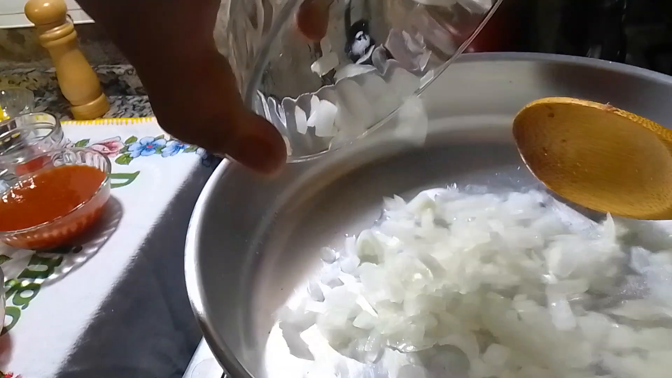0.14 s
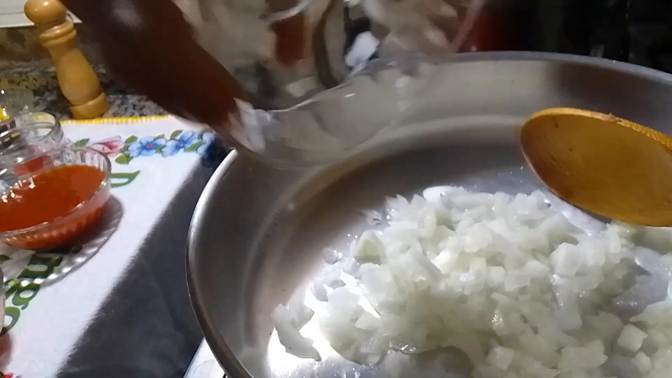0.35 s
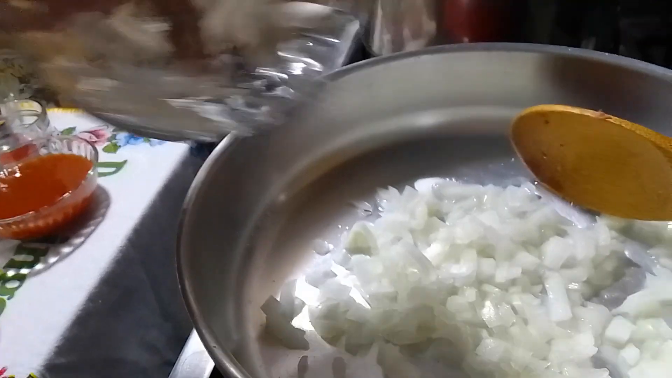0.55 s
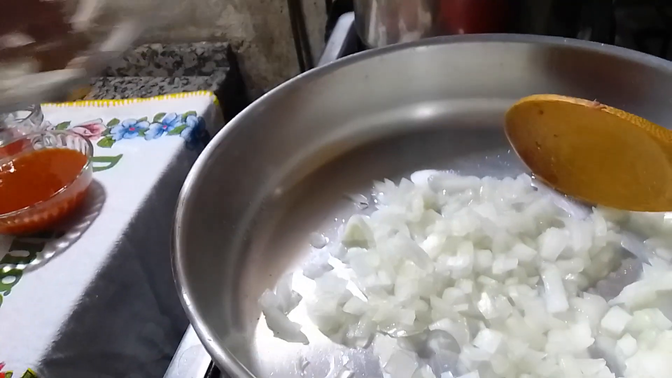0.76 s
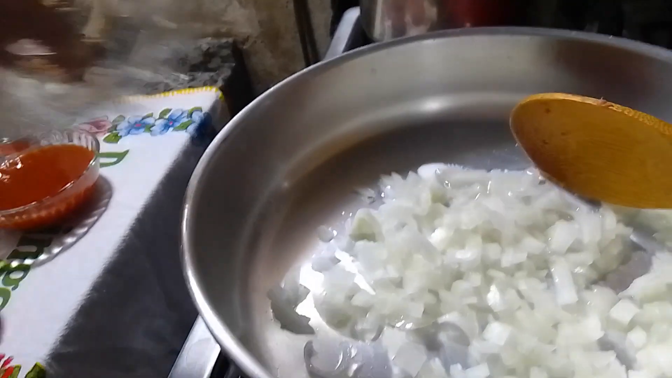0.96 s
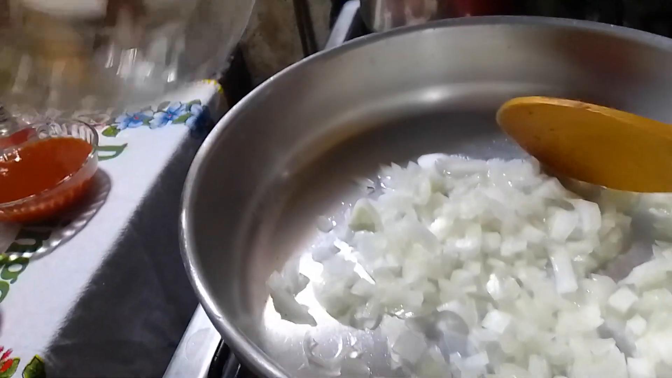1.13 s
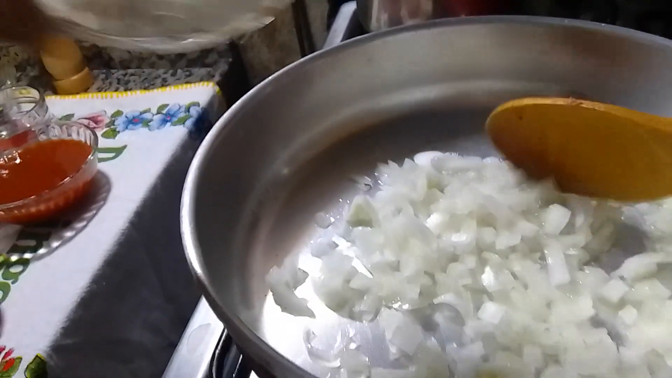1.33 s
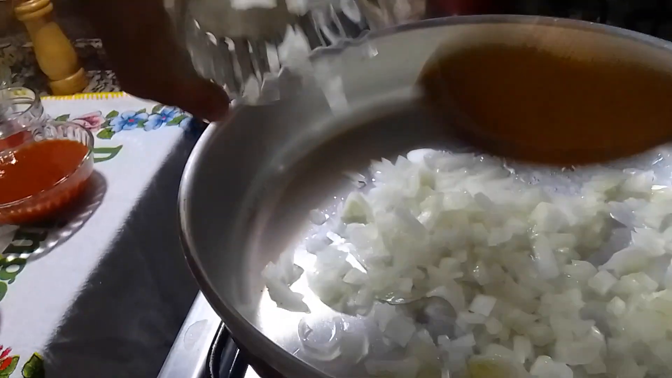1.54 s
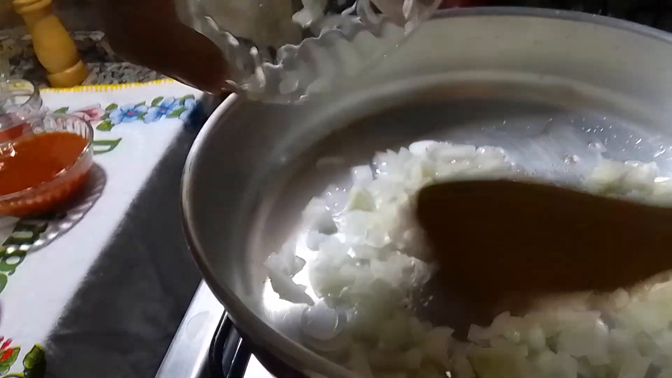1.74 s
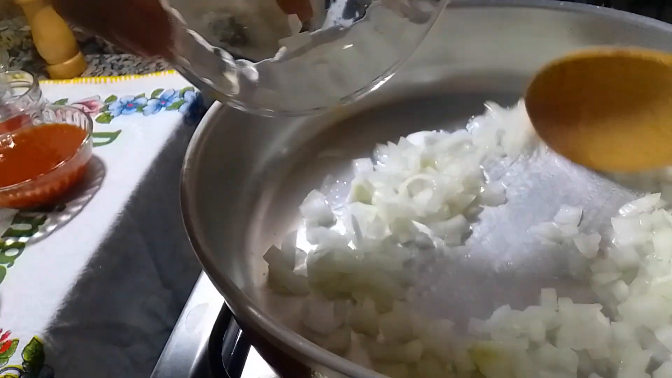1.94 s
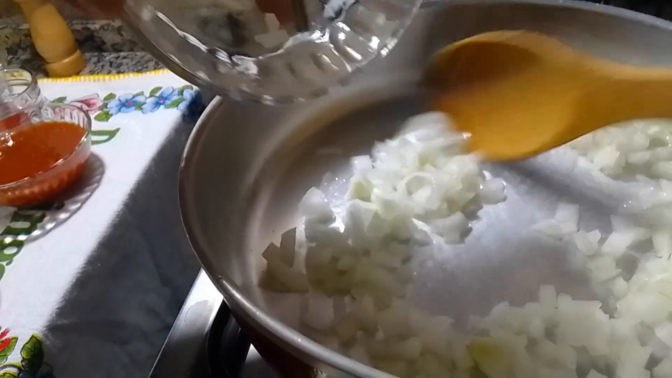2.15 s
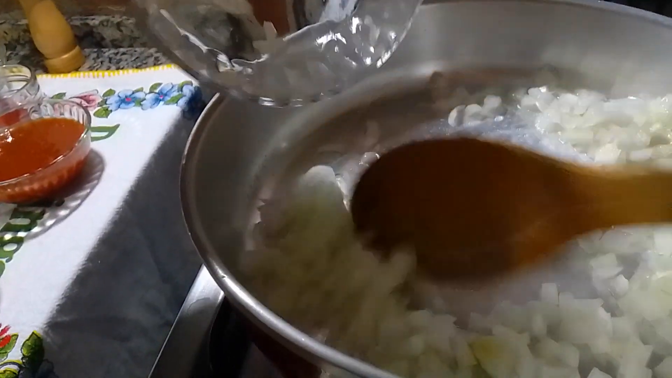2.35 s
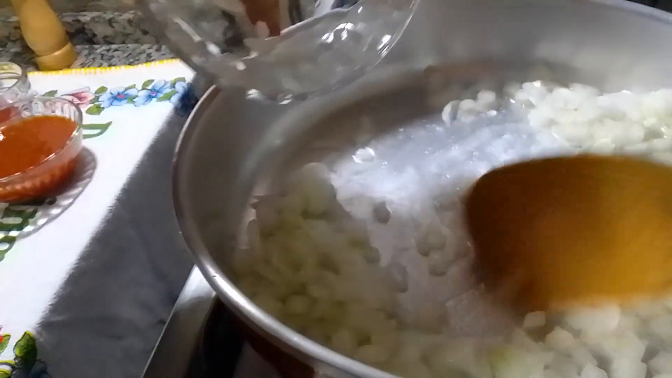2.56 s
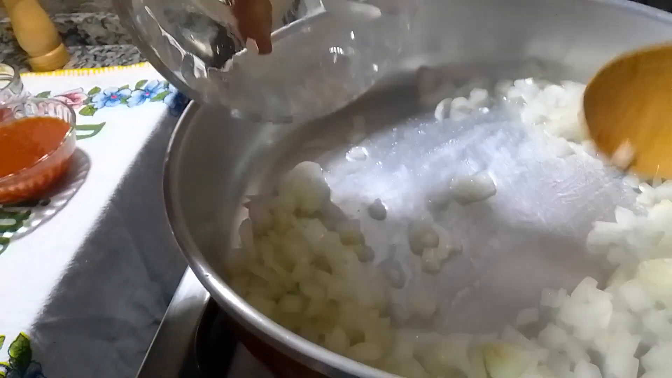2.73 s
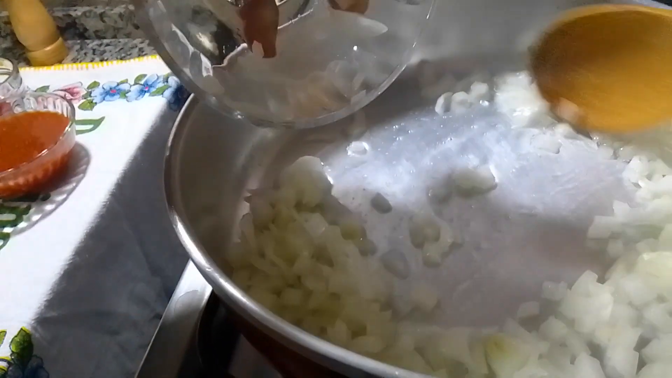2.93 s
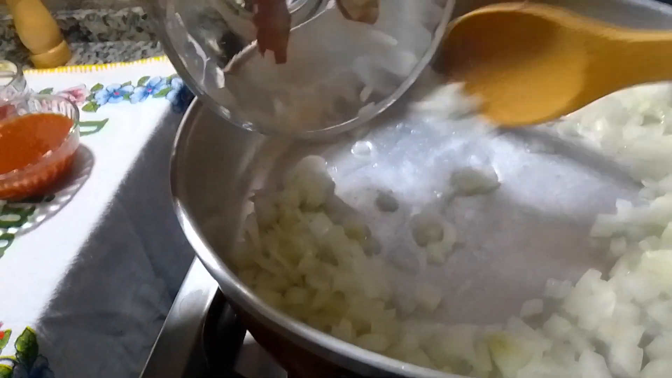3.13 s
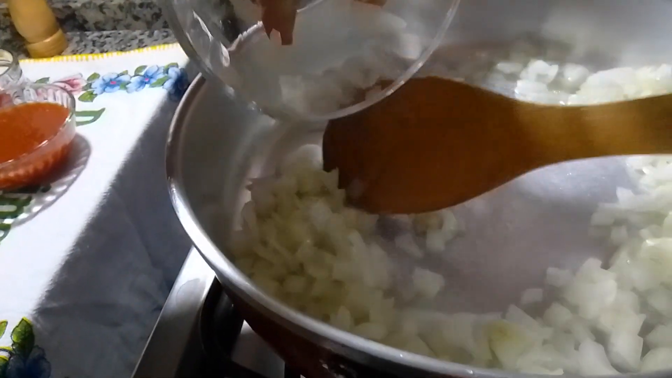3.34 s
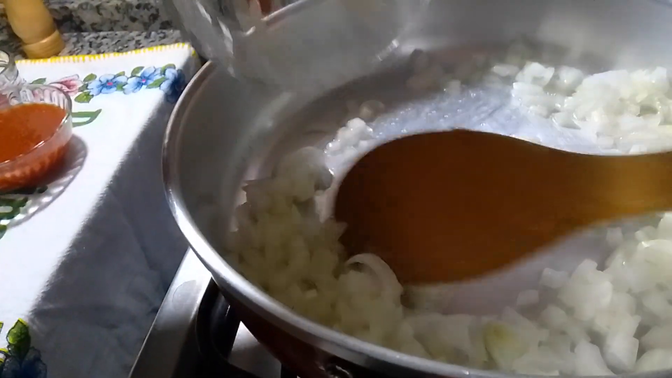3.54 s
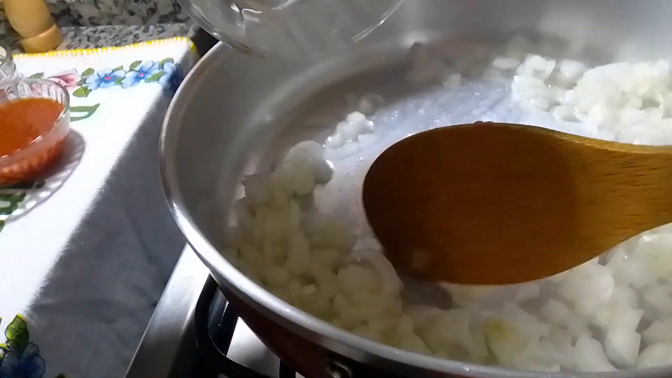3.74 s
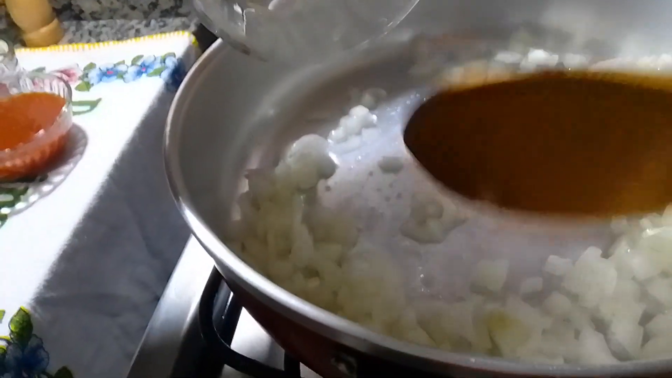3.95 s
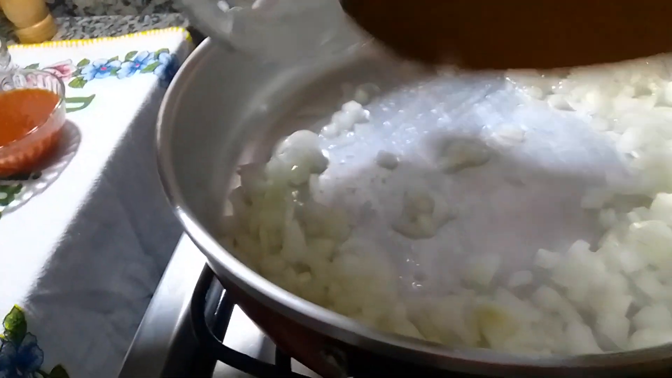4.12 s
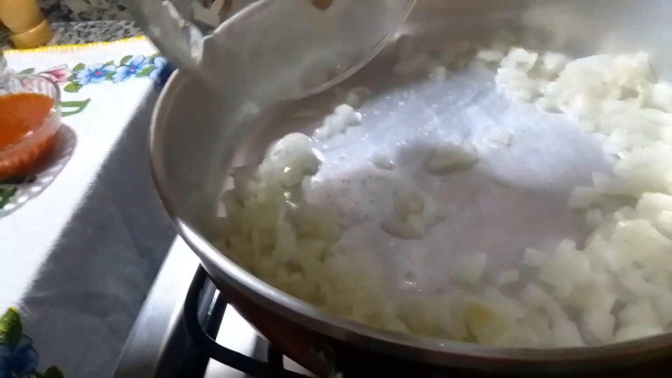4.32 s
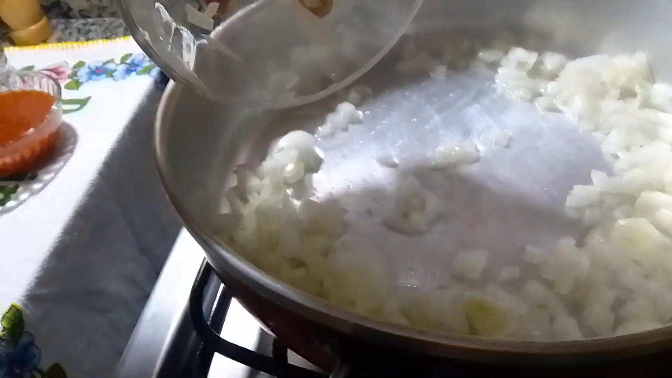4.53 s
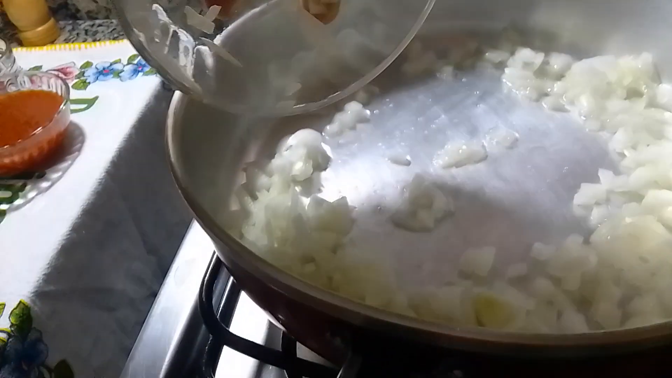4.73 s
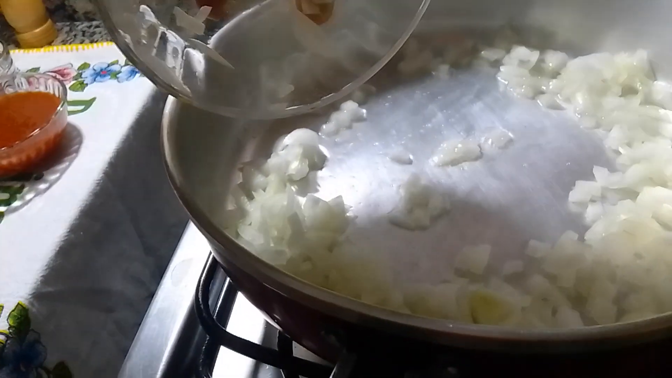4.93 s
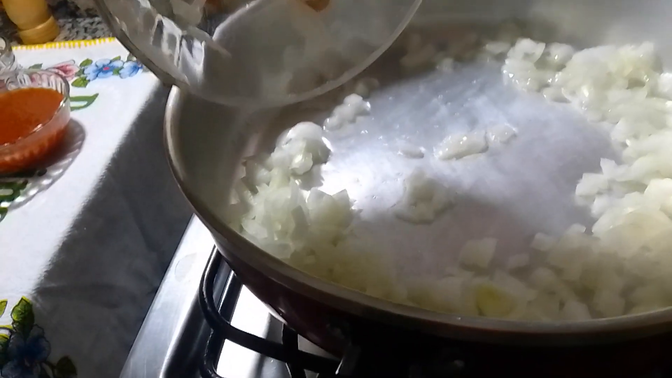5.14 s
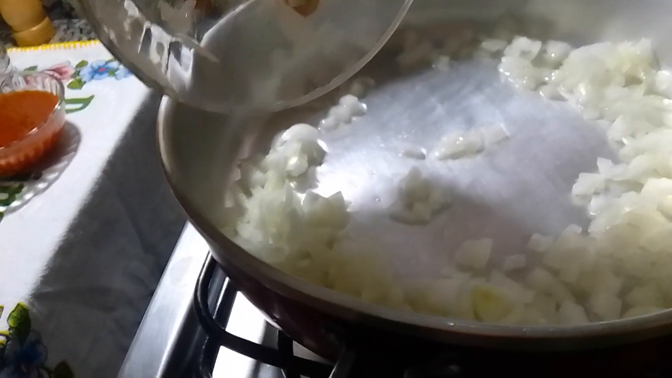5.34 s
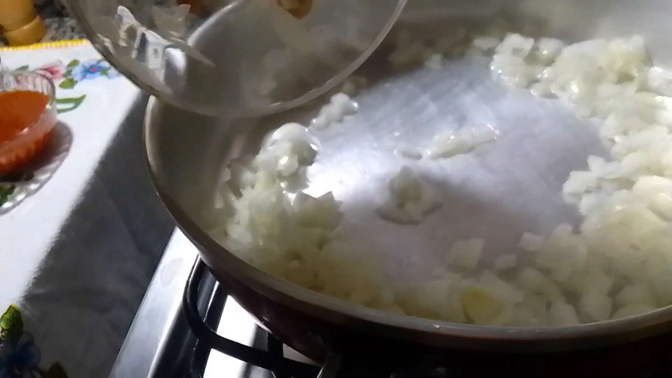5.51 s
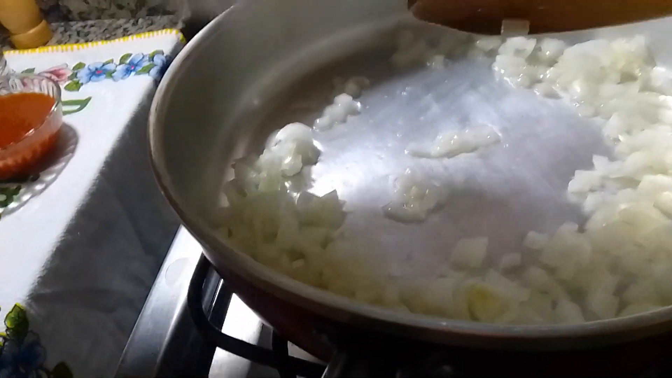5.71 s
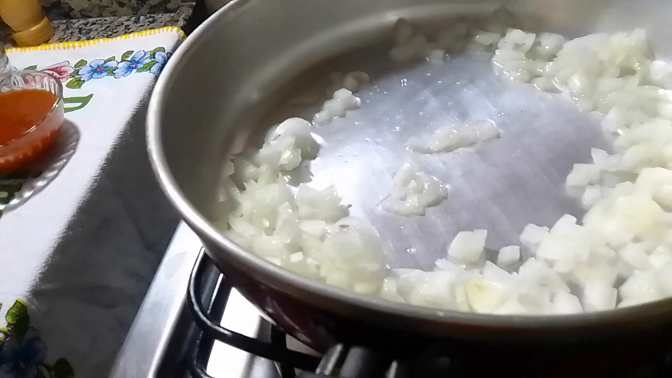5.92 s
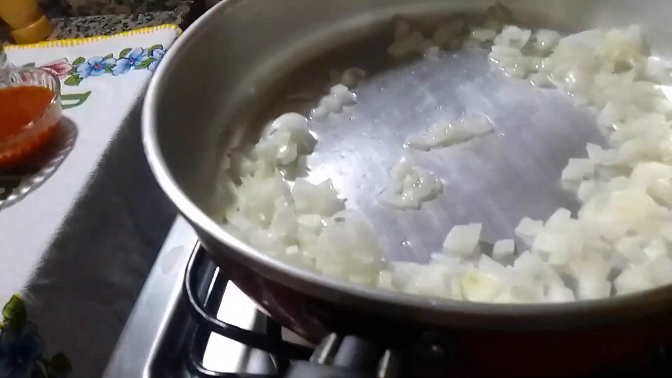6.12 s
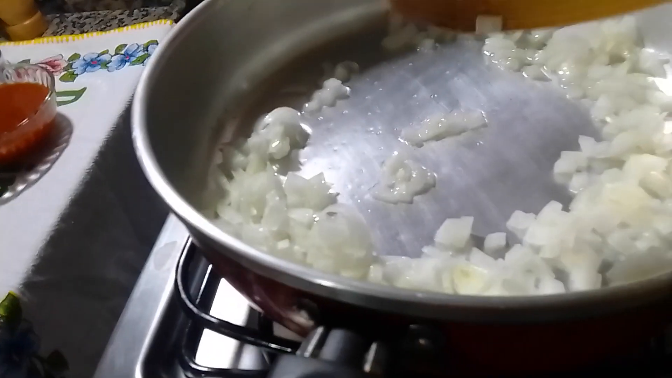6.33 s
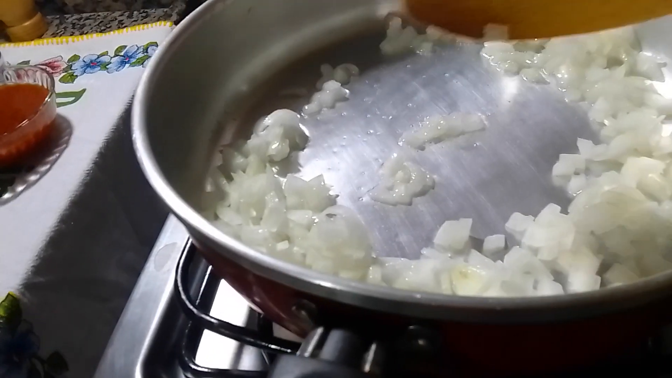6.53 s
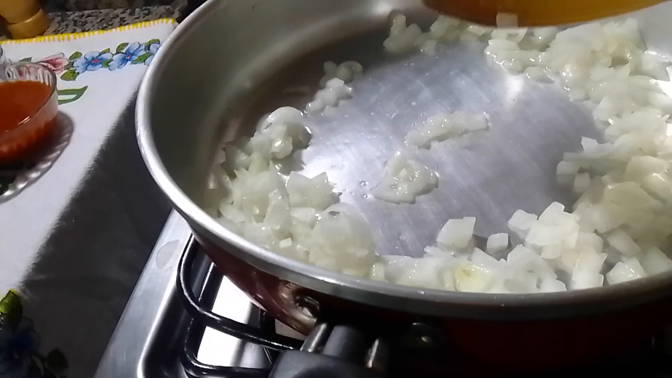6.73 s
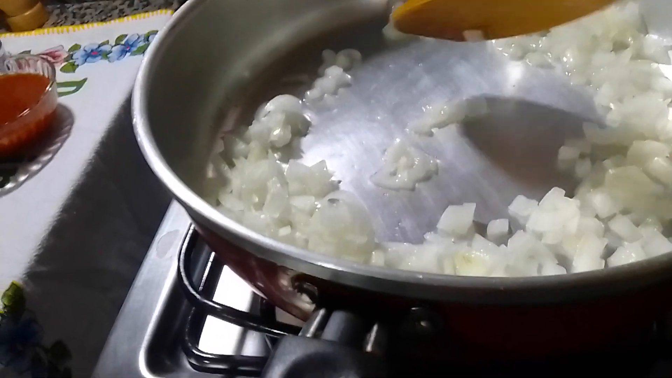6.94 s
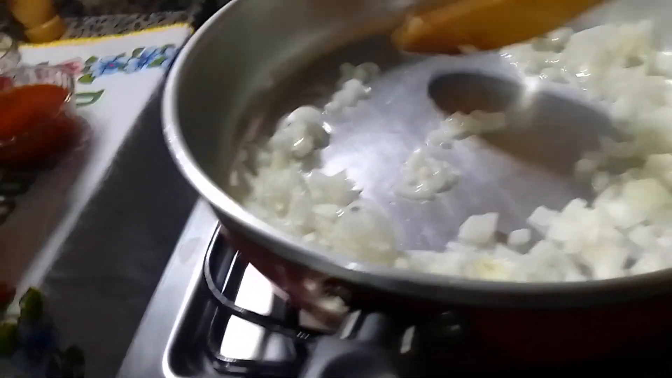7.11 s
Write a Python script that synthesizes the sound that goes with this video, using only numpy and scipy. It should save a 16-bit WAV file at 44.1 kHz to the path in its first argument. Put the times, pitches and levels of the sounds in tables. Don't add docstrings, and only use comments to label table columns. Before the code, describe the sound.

At 0 s a light frying hiss is already present, with small knocks of bowl and onion on a steel pan. Around 0.1 s the wet onion lands in a cluster of short, damped metallic thuds and the frying leaps into a dense, bright, steamy roar, loudest near 0.2-0.3 s, with a brief low splutter underneath. It eases quickly through the first second, with wet pops and sharp spits. At about 1.7-1.85 s a wooden spoon knocks the pan and drags onion over its floor, and the sizzle swells slightly near 2.1 s. Softer knocks and a scrape come at 3.2-3.4 s, a very faint tap near 4.5 s, and a light clink at 5.2 s. The sizzle keeps thinning to a fine crackle until 7 s. Close, dry kitchen sound, centred, weak in bass, with a ringing high edge near 9 kHz.

```python
import sys
import numpy as np
from scipy import signal
from scipy.fft import rfft, irfft, next_fast_len
from scipy.io import wavfile
from scipy.ndimage import uniform_filter1d, map_coordinates

SR = 44100
rng = np.random.default_rng(int(sys.argv[2]) if len(sys.argv) > 2 else 0)


def voltage_ratio(decibels):
    exponent = np.asarray(decibels, float) / 20
    return 10 ** exponent


def unload_wav(signal):
    wavfile.write(
        sys.argv[1],
        SR,
        np.round(np.clip(np.atleast_2d(signal).T, -1, 1) * 32767).astype(np.int16),
    )


N = 316195

# pitch_hz, level_db (per Hz)
FIZZ = [(2710, -37), (4600, -20), (5790, -17), (8940, 0), (12100, -11), (15600, -15)]
# pitch_hz, level_db, fade_s (time to fall 60 dB)
PAN = [(175, -1.5, .12), (230, 9.5, 0.17), (349, -1, 0.22), (472, 4.5, 0.13), (612, -6, 0.29),
       (751, 0, 0.1), (850, 4, 0.058), (950, 3.5, 0.067), (1075, -2.5, 0.026), (1268, 9, 0.035),
       (1620, 3, 0.049), (1970, 5.5, 0.043), (2280, 1, 0.066), (2710, 5, 0.059)]


def frying():
    # pitch_hz, level_db (per Hz)
    drone_colour = [(300, -23.5), (450, -11), (800, 1.5), (1200, -2), (1700, -31)]
    # pitch_hz, level_db (per Hz)
    splutter_colour = [(24, -54), (40, -26), (81, -25), (145, -2.5), (197, -4), (295, 0), (500, 3),
                       (650, -24.5)]
    fizz_gain, hiss_gain, drone_gain, low_gain = layer_levels()
    surge_db = 0.16 * wobble(9) + 0.35 * wobble(21.9) + 0.43 * wobble(60)
    crowd = bursts(share=0.012, spread_db=2.5, life_s=0.0027, cap_db=12)
    lumps = bursts(share=0.003, spread_db=4.0, life_s=0.0042, cap_db=-1)

    fizz = coloured(patchy(crowd + blur(6.1), depth_db=0.69, drift_db=0.4), FIZZ)
    hiss = pan_air(patchy(crowd + blur(6.0), depth_db=0.8, drift_db=1.3))
    rings = [(hz, 0.87 / fade_s, -1.5 + db) for hz, db, fade_s in PAN]
    rumble = 0.67 * crowd + 0.75 * lumps + blur(2.5)
    drone = coloured(patchy(rumble, depth_db=1.5, drift_db=0.0), drone_colour, rings)
    low = coloured(0.5 * crowd + lumps + blur(7.5), splutter_colour, rings)

    fizz = voltage_ratio(0.5) * fizz_gain * unit(voltage_ratio(surge_db) * fizz)
    hiss = hiss_gain * unit(voltage_ratio(1.9 * surge_db) * hiss)
    drone = drone_gain * unit(voltage_ratio(1.6 * surge_db + 0.52 * wobble(5.5)) * drone)
    low = low_gain * unit(voltage_ratio(0.44 * surge_db + 1.3 * wobble(14)) * low)
    return fizz + hiss + drone + low


def bursts(share, spread_db, life_s, cap_db):
    draw = rng.random((N, 2))
    size_db = np.minimum(-spread_db * np.log(draw[:, 1] + 1e-9), cap_db)
    starts = (draw[:, 0] < share) * voltage_ratio(size_db)
    puff = voltage_ratio(-60 * np.arange(600) / SR / life_s)
    return unit(signal.fftconvolve(starts, puff)[:N] * rng.standard_normal(N))


def blur(level_db):
    return voltage_ratio(level_db) * rng.standard_normal(N)


def layer_levels():
    # start_s, length_s, strength_db
    drags = [
        (0.0, 0.1, -49),
        (0.066, 0.089, -38),
        (1.706, 0.24, -45.5),
        (1.95, 0.13, -46),
        (2.547, .35, -55),
        (3.213, 0.224, -46.5),
        (3.55, .3, -63),
    ]
    t = np.arange(N) / SR
    fizz_db = strength_db(t)
    swing_db = fizz_db - fizz_db.mean()
    hiss_db = fizz_db.mean() - 17 + 1.025 * swing_db

    lands_s, spreads_s, settles_s = 0.11, 0.084, 0.25
    since = np.maximum(t - lands_s, 0)
    wet = (1 - np.exp(-since / spreads_s)) * np.exp(-since / settles_s)

    drag, ramp_s = 0, 0.014
    for start, length, db in drags:
        to_nearest_end = np.minimum(t - start, start + length - t)
        drag = drag + voltage_ratio(db) * np.clip(to_nearest_end / ramp_s, 0, 1)
    drone = np.hypot(voltage_ratio(-53.5 + 0.54 * swing_db + 26 * wet), drag)
    low = np.hypot(voltage_ratio(-57 + 0.32 * swing_db + 29 * wet), voltage_ratio(-4) * drag)
    return voltage_ratio(fizz_db), voltage_ratio(hiss_db), drone, low


def strength_db(s):
    # time_s, level_db
    strength = [(0, -25.5), (.05, -31), (.059, -20.5), (.085, -19.5), (.1, -13.5), (.19, -8), (.33, -9.5),
                (.7, -13.5), (1.12, -16.5), (1.65, -17), (2.08, -14.5), (2.33, -17.5), (2.6, -15.5),
                (3.2, -18), (3.95, -20.5), (4.6, -22), (5.75, -23.5), (7.17, -25.5)]
    return np.interp(s, *np.transpose(strength))


def spits():
    # start_s, push_peak_db, middle_db
    pops = [(0.428, -27, -15), (0.613, -35, -20), (0.639, -31, -34), (0.675, -26, -34), (0.705, -34, -15.5),
            (0.799, -30, -34), (0.875, -31, -20), (0.892, -37, -20), (1.071, -28.5, -30), (1.129, -48, -24),
            (1.199, -54, -37), (1.303, -32, -17), (1.356, -45, -23), (1.459, -42, -22), (1.592, -51, -34),
            (2.053, -28.5, -22), (2.163, -30, -17.5), (2.226, -32.5, -30), (2.257, -35, -37),
            (2.548, -36, -24), (2.802, -31, -29), (3.632, -38, -22.5), (4.594, -45, -23)]
    # pitch_hz, width_hz, level_db
    song = [(8700, 4500, 5)]
    rows = bubbles()
    crack = puffs(rows, column=1, life_s=0.0047, crack=2.3, late_s=0.0011)
    bright = voltage_ratio(5) * coloured(crack, FIZZ, song)
    middle = voltage_ratio(12) * pan_air(puffs(rows, column=2, life_s=0.01, crack=3.2, late_s=0.00095))
    thump = puffs(pops, column=1, life_s=0.013, crack=45, late_s=0.00342)
    push = voltage_ratio(18) * coloured(thump, [(60, -44), (200, 7.5), (600, 7.5), (1300, 5), (4000, -40)])
    slap = voltage_ratio(17) * pan_air(puffs(pops, column=2, life_s=0.04, crack=2.8, late_s=0.00205))
    return bright + middle + push + slap


def bubbles():
    # start_s, peak_db, middle_db
    large = [(0.0323, -4, -34), (0.0578, -8, -35), (0.0932, 9, -22), (0.1236, 8, -29), (0.6205, 7, -24),
             (0.6744, 19, -33), (0.7632, 6, -36), (0.8709, 3, -12), (2.7225, 0, -19), (1.843, -2, -17),
             (2.2124, 8, -33), (2.4718, 4.5, -15), (2.7965, 9, -33), (2.8429, 3, -16), (2.9552, 2, -16),
             (3.5039, 7, -23), (3.6321, 4, -29), (3.8307, 3.5, -29), (3.8531, -3, -26), (4.2961, 4, -20),
             (4.5955, 4, -28), (4.8184, -12, -24), (5.3009, -5, -32), (6.2477, -9, -35), (6.2801, 4.5, -25),
             (6.4273, 0, -50), (6.562, -2.5, -38), (6.7077, -6, -40), (6.8154, -6, -36), (6.9471, 0.5, -43)]
    count, scatter_db = 40, 3
    s = rng.uniform(0.15, 7.1, count)
    luck_db = scatter_db * rng.standard_normal((2, count))
    peak_db = strength_db(s) + 15 + luck_db[0]
    middle_db = strength_db(s) - 15 + luck_db[1]
    return np.vstack([large, np.transpose([s, peak_db, middle_db])])


def puffs(rows, column, life_s, crack, late_s):
    out, t = np.zeros(N + 2000), np.arange(1500) / SR
    for row, noise in zip(rows, rng.standard_normal((len(rows), 1500))):
        puff = np.where(t > 0, noise, -crack) * voltage_ratio(-60 * t / life_s)
        start = round((row[0] + late_s) * SR)
        out[start:][:len(t)] += voltage_ratio(row[column]) * puff / np.linalg.norm(puff)
    echo = np.roll(out, round(0.0017 * SR))
    return out[:N] + voltage_ratio(-11.5) * echo[:N]


def knocks():
    # start_s, peak_db, centre_hz, spread_octaves, ring_share (of fade_s)
    tipping = [(.012, -25, 774, 0.1, 3.2), (0.011, -32, 1620, .1, 2.8), (.063, -17.5, 623, 0.22, 1.06),
               (.066, -10, 1100, 0.44, 0.66), (0.066, -22, 2300, .35, 2.7), (.088, -15, 1300, 0.17, 1.7),
               (.104, -12.5, 870, .2, 0.65), (.121, -17, 735, 0.098, 0.7), (5.162, -22.5, 1620, 0.2, 0.5),
               (5.164, -24, 1075, 0.082, 2.4), (5.162, -28, 2200, .3, .2)]
    # start_s, peak_db, centre_hz, spread_octaves
    spoon = [(1.71, -30, 170, 0.22), (1.753, -24, 186, 0.17), (1.709, -26, 850, 0.34),
             (1.75, -8.5, 1190, 0.52), (1.754, -16.5, 425, 0.28), (1.759, -15, 900, .8),
             (1.769, -25, 650, 0.25), (1.843, -15, 754, 0.64), (3.215, -20.5, 643, 0.22),
             (3.224, -18, 750, 0.27), (3.215, -16.5, 1800, 0.39), (3.222, -26, 253, .3),
             (3.236, -25, 503, 0.56), (3.254, -23.5, 746, 0.081), (3.27, -29, 450, 0.74),
             (3.289, -31, 750, 0.18), (3.322, -18, 950, 0.15), (3.322, -19, 1500, 1.1),
             (3.337, -20, 2300, 0.21), (3.345, -27, 550, 0.6), (3.372, -33, 850, 0.33),
             (4.486, -35, 300, 0.52)]
    out, t = np.zeros(N + SR), np.arange(SR // 4) / SR
    hz, level_db, fade_s = np.transpose(PAN)[:, :, None]
    sides = np.where(np.arange(len(PAN))[:, None] % 3 == 1, -1, 1)
    blows = tipping + [(*row, 0.4) for row in spoon]
    lucks_db = rng.standard_normal((len(blows), len(PAN), 1))
    for (s, db, centre_hz, spread, ring), luck_db in zip(blows, lucks_db):
        octaves_off = np.log2(hz / centre_hz)
        reach = sides * voltage_ratio(level_db + luck_db) * np.exp(-0.5 * (octaves_off / spread) ** 2)
        onset = 1 - np.exp(-t / 0.00027)
        tones = voltage_ratio(-60 * t / (fade_s * ring)) * np.sin(2 * np.pi * hz * t) * onset
        blow = np.sum(reach * tones, axis=0) / np.linalg.norm(reach)
        out[round(s * SR):][:len(t)] += voltage_ratio(db - 5) * blow
    return out[:N]


def pan_air(x):
    # pitch_hz, level_db (per Hz)
    air = [(530, -30.5), (900, -11.5), (1200, -11.5), (1390, -6), (3240, 0.5), (5500, -5.5), (7150, 1.5),
           (12100, -120)]
    # pitch_hz, width_hz, level_db
    bare = [(1300, 110, 9), (2380, 150, 3), (2880, 420, 5), (3550, 160, 3), (4740, 340, -8)]
    # pitch_hz, width_hz, level_db
    shaded = [(1356, 100, 8.5), (2007, 310, 7.5), (2830, 1200, -5), (3690, 120, -4.5), (4060, 530, 7)]
    # time_s, open_share (0-1)
    floor_open = [(0, 0.34), (1, 0.38), (1.3, 0.55), (1.55, .9), (1.8, 0.53), (2.1, 0.2), (2.7, 0.6),
                  (3.2, 0.37), (3.55, 0.45), (4.3, 0.84), (4.5, 0.2), (5.1, 0.3), (5.4, 0.67), (6.4, 1),
                  (6.7, 0.7), (7.17, 0.5)]
    share = np.clip(np.interp(np.arange(N) / SR, *np.transpose(floor_open)), 0, 1)
    cover_loss = voltage_ratio(-0.5)
    return share * coloured(x, air, bare) + (1 - share) * cover_loss * coloured(x, air, shaded)


def patchy(x, depth_db, drift_db):
    z = signal.stft(x, nperseg=256)[2]

    def field(tall, long):
        rough = rng.standard_normal(z.shape)
        return unit(uniform_filter1d(uniform_filter1d(rough, size=tall, axis=0), size=long, axis=1))

    gain_db = depth_db * field(6, 12) + drift_db * field(2, 150)
    return signal.istft(z * voltage_ratio(gain_db), nperseg=256)[1][:N]


def coloured(x, points, peaks=()):
    hz = np.fft.rfftfreq(8192, 1 / SR)
    f, db = np.transpose(points)
    gain = voltage_ratio(np.interp(np.log(hz + 1), np.log(f + 1), db))
    for centre_hz, width_hz, peak_db in peaks:
        gain = gain * voltage_ratio(peak_db / (1 + ((hz - centre_hz) / (width_hz / 2)) ** 2))
    cepstrum = irfft(np.log(gain + 1e-5))
    cepstrum[1:4096] *= 2
    cepstrum[4097:] = 0
    response = irfft(np.exp(rfft(cepstrum)))
    return signal.fftconvolve(x, response / np.linalg.norm(response))[:len(x)]


def wobble(rate):
    knots = rng.standard_normal(int(N * rate / SR) + 4)
    return map_coordinates(knots, [np.arange(N) * rate / SR])


def unit(x):
    return x / np.sqrt(np.mean(x ** 2) + 1e-20)


def scene():
    return np.tile(frying() + spits() + knocks(), (2, 1))


def low_pass(x):
    return signal.sosfilt(signal.butter(12, 16960, fs=SR, output="sos"), x)


def record(dry):
    # pitch_hz, level_db
    mic = [(0, -30), (30, -16), (70, -17), (100, -9), (140, -2), (220, -.5), (15650, 0), (15800, -90)]
    m = next_fast_len(N)
    swing = np.abs(signal.hilbert(dry, m))[:, :N]
    held = dry / (1 + (swing / 0.72) ** 6) ** (1 / 6)
    gain = voltage_ratio(np.interp(np.fft.rfftfreq(m, 1 / SR), *np.transpose(mic)))
    mix = irfft(rfft(held, m) * gain, m)[:, :N]
    return low_pass(mix)


dry = scene()
out = record(dry)
unload_wav(out)
```